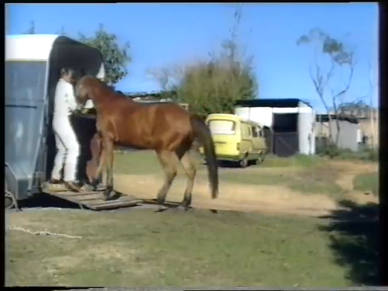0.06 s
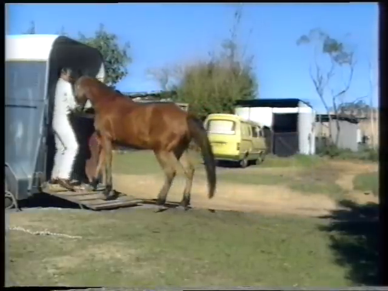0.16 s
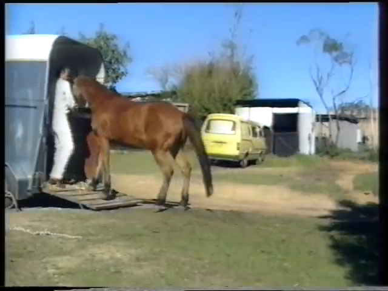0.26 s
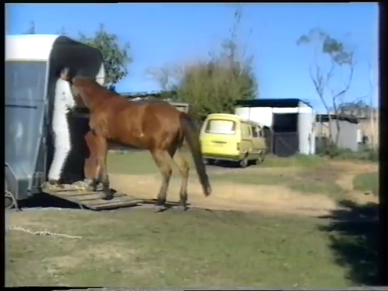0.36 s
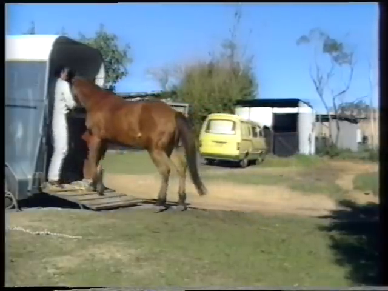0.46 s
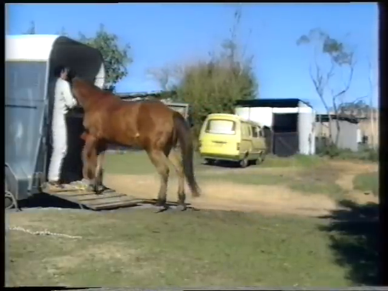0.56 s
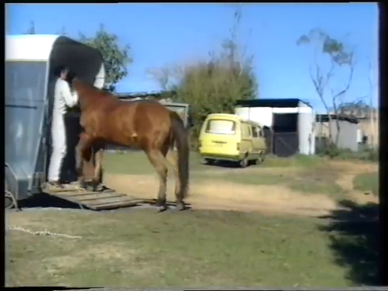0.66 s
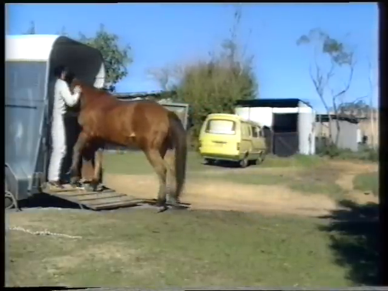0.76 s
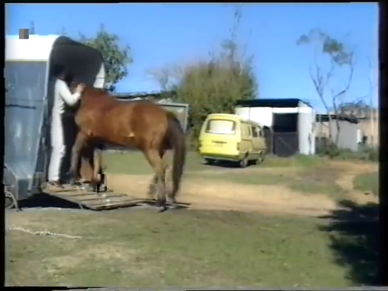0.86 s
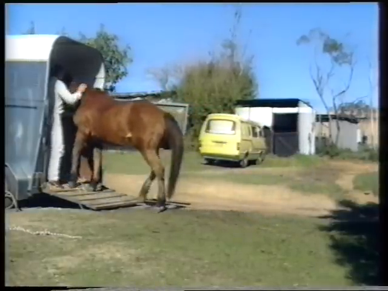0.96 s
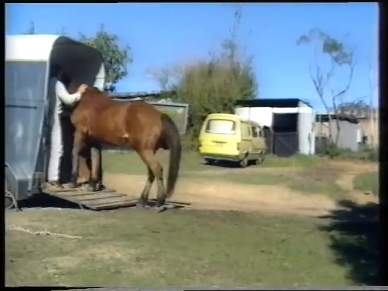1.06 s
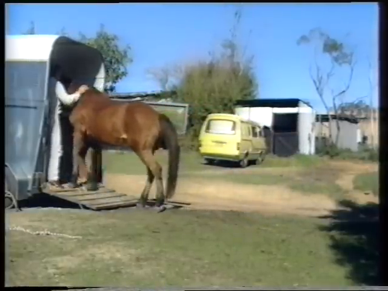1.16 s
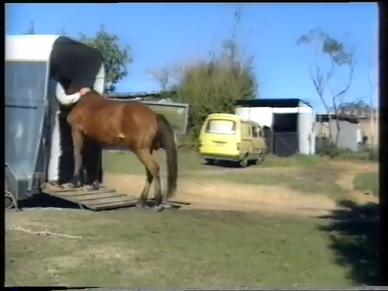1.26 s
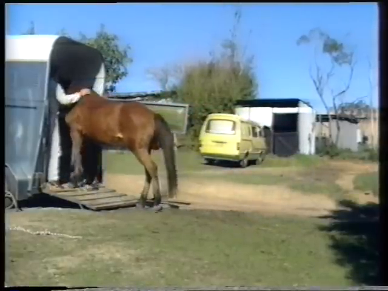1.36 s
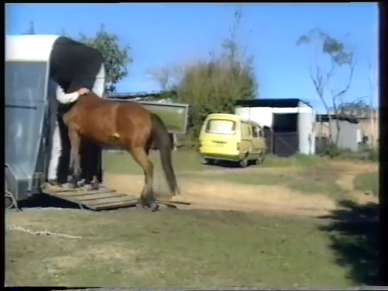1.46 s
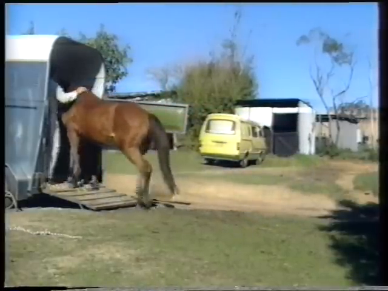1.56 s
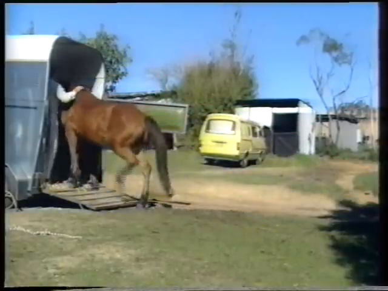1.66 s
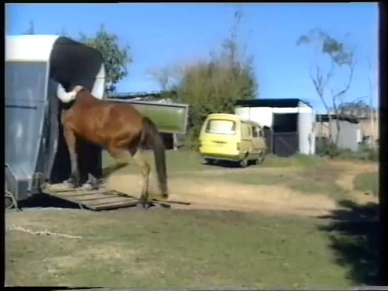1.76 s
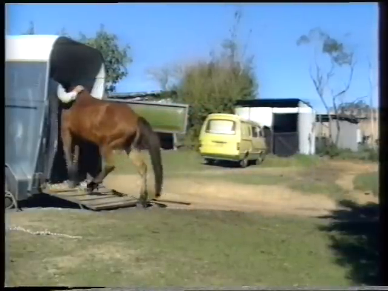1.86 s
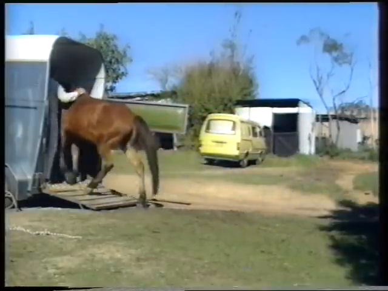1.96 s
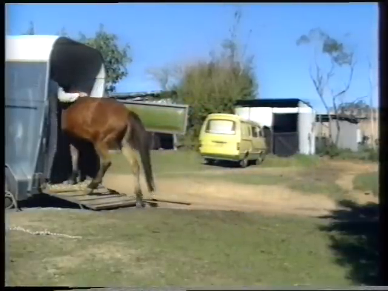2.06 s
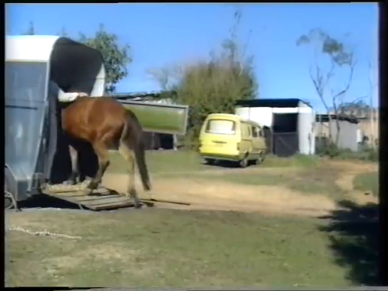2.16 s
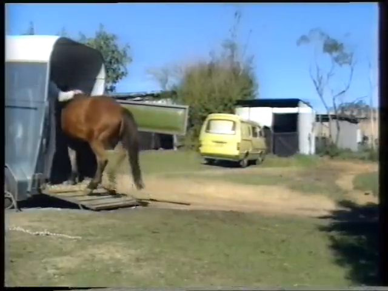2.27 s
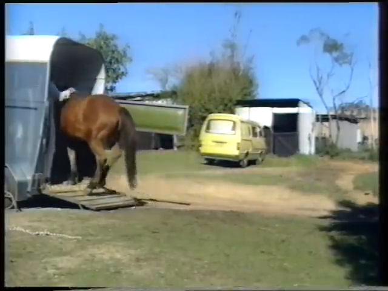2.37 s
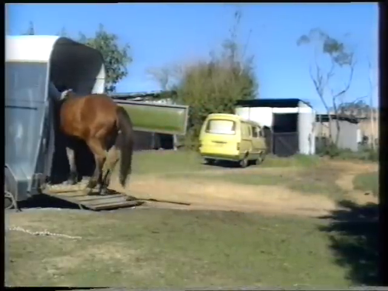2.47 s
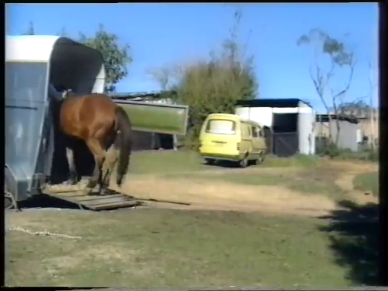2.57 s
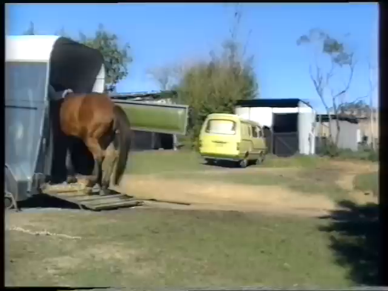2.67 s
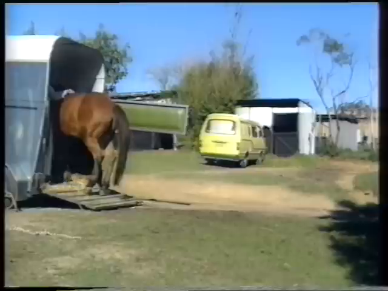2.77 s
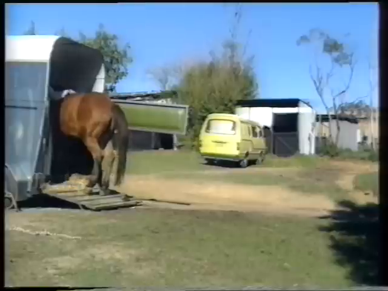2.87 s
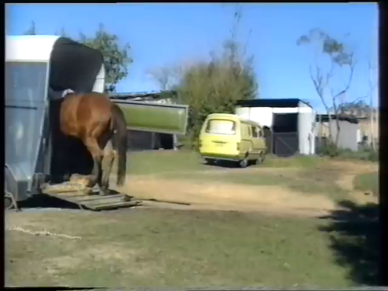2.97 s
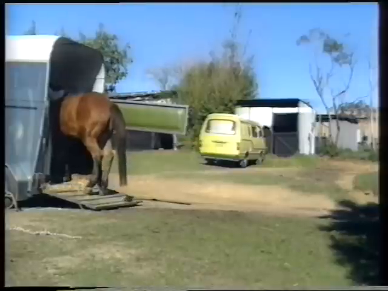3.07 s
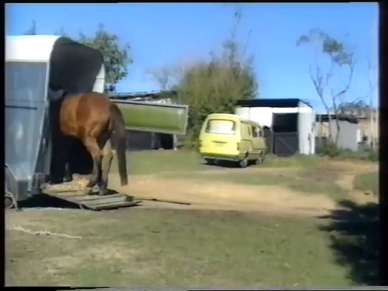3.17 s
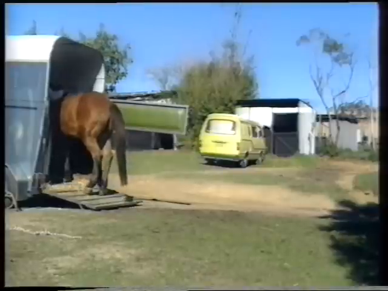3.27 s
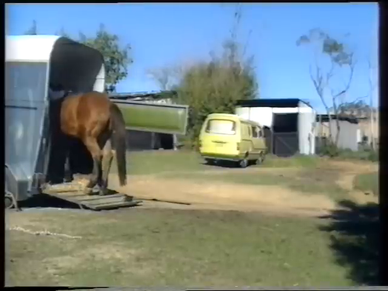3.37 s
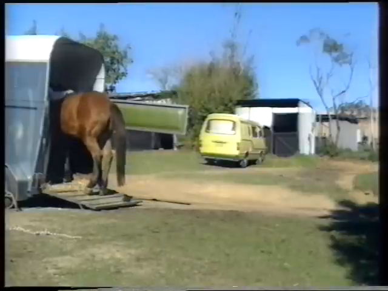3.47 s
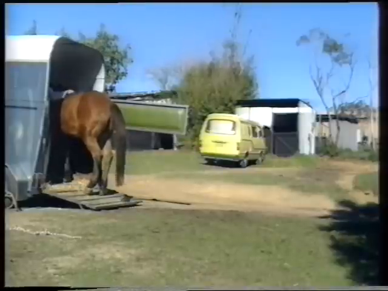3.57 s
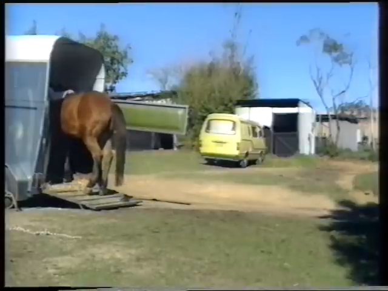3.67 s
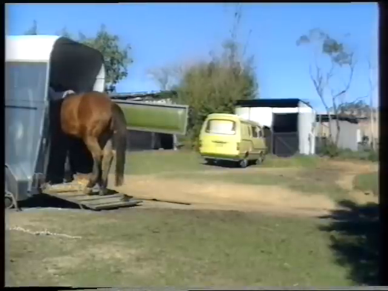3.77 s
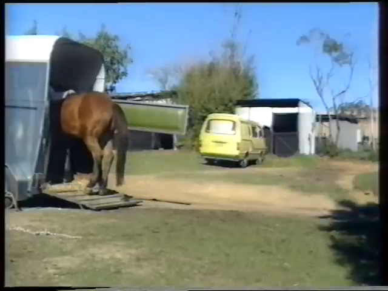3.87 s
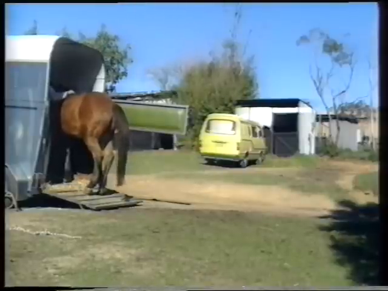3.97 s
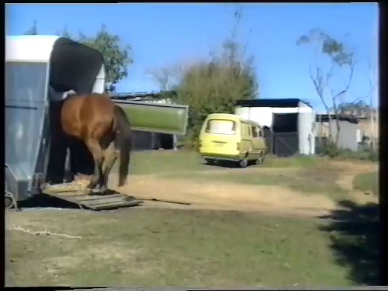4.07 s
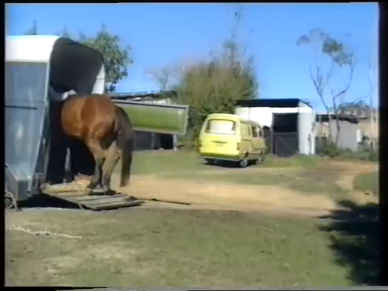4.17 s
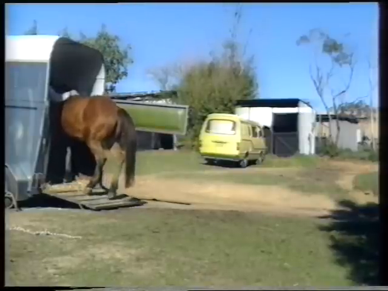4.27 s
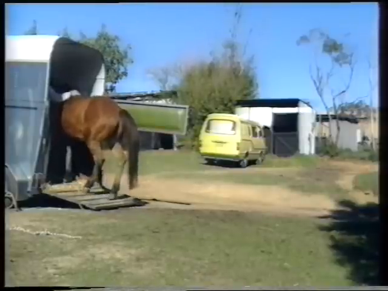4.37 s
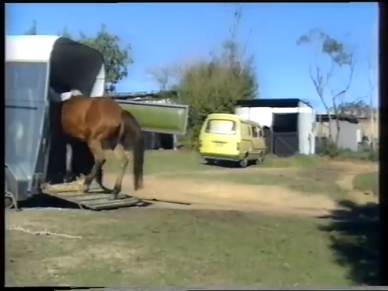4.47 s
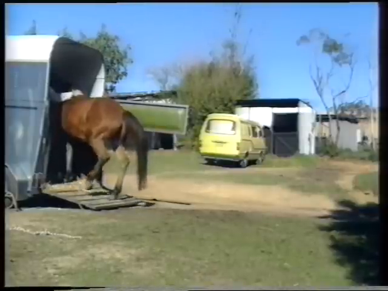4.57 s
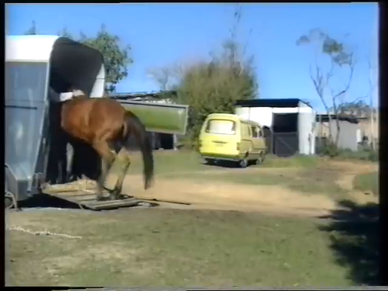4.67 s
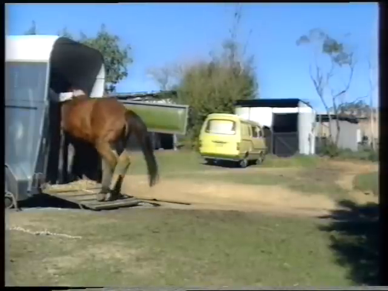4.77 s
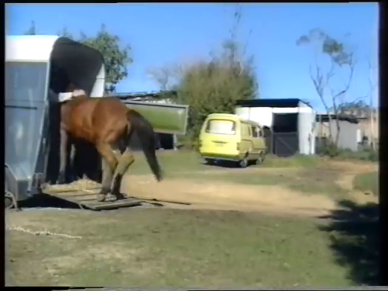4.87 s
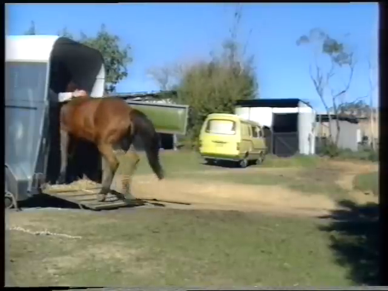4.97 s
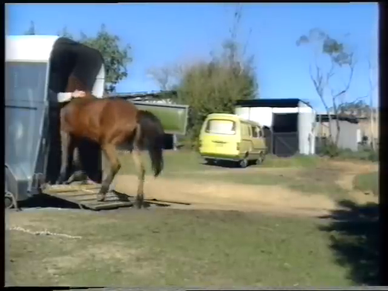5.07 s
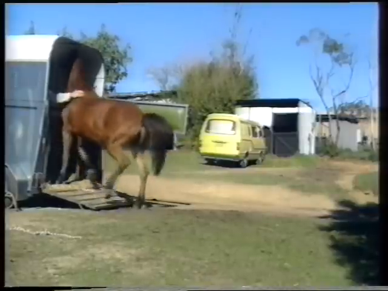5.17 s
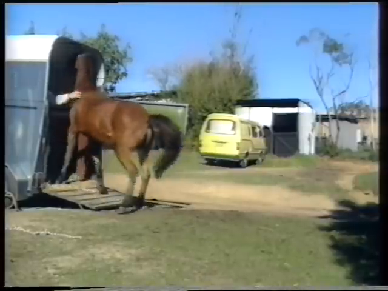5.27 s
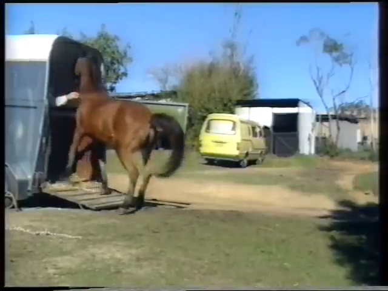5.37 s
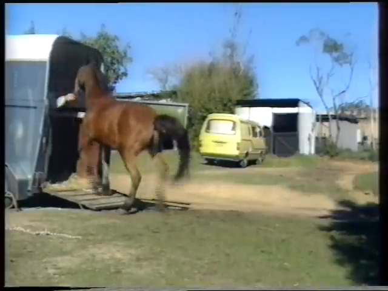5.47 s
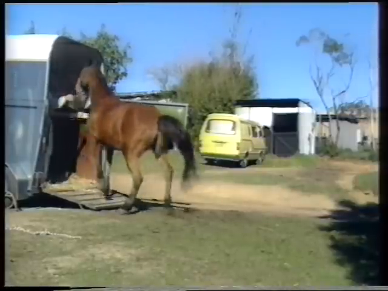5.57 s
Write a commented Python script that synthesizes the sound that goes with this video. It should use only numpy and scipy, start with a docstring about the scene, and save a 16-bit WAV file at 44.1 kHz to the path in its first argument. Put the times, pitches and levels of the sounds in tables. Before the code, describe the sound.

A horse steps into a wooden-floored trailer, pauses, then clatters back out; booming board knocks, gritty scrapes, old camera hiss and faint high whine.

```python
"""Across a quiet yard, a horse steps up a wooden ramp into a trailer and backs out again.
Each hoof knocks the boards, which boom as clusters of decaying modes; loose boards rebound and fittings clink.
The trailer shudders on and hooves scuff over grit: shaped noise and clicks under swelling gains.
Echoes come back from sheds and the trailer shell.
An old tape camera adds hiss, mains hum, its picture-line whine and field ticks."""
import sys
import numpy as np
from scipy import signal
from scipy.fft import rfft, irfft, next_fast_len
from scipy.io import wavfile

SR = 44100
rng = np.random.default_rng(int(sys.argv[2]) if len(sys.argv) > 2 else 0)


def file_out(sig):
    """Save sig as 16-bit WAV at sys.argv[1]."""
    # one column per channel
    cols = np.atleast_2d(sig).T
    # limit, then scale
    lim = np.clip(cols, -1, 1)
    pcm = np.round(lim * 32767).astype(np.int16)
    wavfile.write(sys.argv[1], SR, pcm)


def undo_db(level):
    """Turn decibels back into plain size, where 20 dB means ten times bigger."""
    steps = np.asarray(level, float) / 20
    return 10 ** steps


N = 247401  # samples in the scene


def evened(x):
    """Scales to rms 1."""
    return x / np.sqrt(np.mean(x ** 2) + 1e-20)


def read(points, hz):
    """Reads a table along log frequency."""
    f, value = np.transpose(points)
    return np.interp(np.log(hz + 1), np.log(f + 1), value)


def coloured(x, points):
    """Filters x by a spectrum and scales it to rms 1, so only the shape of the spectrum counts."""
    size = next_fast_len(x.shape[-1])
    gain = undo_db(read(points, np.fft.rfftfreq(size, 1 / SR)))
    return evened(irfft(rfft(x, size) * gain, size)[..., :x.shape[-1]])


def drift(per_s):
    """Slow random wander of rms 1: noise kept mostly below per_s Hz."""
    size = next_fast_len(N)
    smooth = 1 / (1 + (np.fft.rfftfreq(size, 1 / SR) / per_s) ** 4)
    return evened(irfft(rfft(rng.standard_normal(size)) * smooth, size)[:N])


def grains(per_s, spread_db):
    """Sparse clicks of random sign, a few of them large."""
    size = undo_db(spread_db * np.minimum(rng.exponential(1, N), 4)) * rng.standard_normal(N)
    return size * (rng.random(N) < per_s / SR)


# how much the horse shifts about between steps: t/s, change of the resting level/dB
RESTLESSNESS = [(0, 0), (.5, 0), (1.25, 1), (1.65, 3), (2.1, 0), (2.3, -4), (2.6, 0), (2.88, -5), (3.15, 1),
                (3.6, -2), (4.05, 0), (4.4, -4), (4.75, 1), (5.12, 2), (5.61, 4)]


def swells(peaks_s, peaks_db, rise_s, fall_s, rest_db):
    """Gain of swells that each rise to a peak and die away, summed in power over the restless shuffle."""
    t = np.arange(0, N + 64, 64) / SR
    late = t - peaks_s[:, None]
    # seconds per 20 dB on either side of the peak; signs in the tables do not matter
    rise = abs(rise_s + 0 * peaks_s)[:, None]
    fall = abs(fall_s)[:, None]
    span = np.where(late < 0, -rise, fall)
    power = (undo_db(peaks_db[:, None] - 20 * late / span) ** 2).sum(0)
    power += undo_db(rest_db + np.interp(t, *np.transpose(RESTLESSNESS))) ** 2
    return np.interp(np.arange(N) / SR, t, np.sqrt(power))


# spectrum of the yard and tape hiss: f/Hz, relative level/dB (per Hz)
AIR_SPECTRUM = [(15, -42), (25, 7), (102, -6.5), (123, -7.5), (152, -4), (316, -16), (352, 13), (392, 6),
                (637, -3.5), (929, -6.5), (1590, -12), (11000, -31), (13500, -23), (15800, -24)]


def yard_air():
    """Yard and tape hiss: shaped noise whose level wanders very slightly."""
    level_db = -58 + 0.18 * drift(3.7)
    return undo_db(level_db) * coloured(rng.standard_normal(N), AIR_SPECTRUM)


# mains hum partials: f/Hz, level/dB (rms)
MAINS_HUM = [(50, -61), (100, -57), (150, -58), (350, -65), (600, -72), (650, -72), (850, -74)]
# wavering picture-line tones: f/Hz, width/Hz, level/dB (rms before the shared wavering)
LINE_WHINE = [(15618, 80, -59), (15718, 70, -62.5), (15480, 300, -64), (11620, 50, -77), (11725, 60, -80)]


def electronics():
    """Mains hum, the wavering whine of the picture lines and two ticks in each picture field."""
    t = np.arange(N) / SR
    hum = sum(undo_db(db) * np.sqrt(2) * np.sin(2 * np.pi * (hz * t + rng.random())) for hz, db in MAINS_HUM)
    whine = sum(undo_db(db) * np.sqrt(2) * drift(width / 2) * np.sin(2 * np.pi * hz * t)
                for hz, width, db in LINE_WHINE)
    since_tick_s = (100 * t % 1 - .5) / 100  # 100 ticks a second
    field = np.exp(-since_tick_s ** 2 / .0003 ** 2) * drift(60)
    ticks = undo_db(-68) * evened(field * np.sin(2 * np.pi * 15200 * t))
    wavering = evened(undo_db(2.5 * drift(6)))
    return hum + wavering * (whine + ticks)


# spectra of grit and of rasping hooves: f/Hz, relative level/dB (per Hz)
GRIT_SPECTRUM = [(1500, -22), (3500, -4.5), (5500, -0.5), (8000, -0.5), (11000, -2.5), (14500, -9.5),
                 (16000, -24)]
RASP_SPECTRUM = [(300, -45), (600, -13), (1000, 0), (1500, 0), (2500, -7), (4000, -14), (6000, -24),
                 (10000, -76)]
# hooves skidding and dragging: peak t/s, 20 dB rise t/s, 20 dB fall t/s, grit level/dB, rasp level/dB
SCUFFS = [(0.0, .01, 0.4, -80, -51), (0.219, 0.12, 0.24, -55.5, -59), (0.335, -0.03, 0.1, -62, -52),
          (0.69, 0.26, 0, -57, -72), (0.77, 0.01, 0.18, -66, -42), (0.87, 0.08, 0.14, -72, -42.5),
          (1.01, 0.1, .5, -64, -51.5), (1.027, 0, 0, -57, -45.5), (1.08, 0, 0.4, -59, -65.5),
          (1.363, 0.03, 0.03, -46, -42), (1.473, 0, 0.08, -61, -37.5), (1.778, .015, .035, -36.5, -24.5),
          (1.815, .02, .06, -56, -38), (1.86, 0.4, .5, -54, -54), (2.09, 0.3, -0.7, -68, -55.5),
          (2.158, -0.05, -0.22, -55, -47), (2.375, .02, 0.06, -46, -46), (2.4, .05, 0.29, -70.5, -42.5),
          (2.672, 0, 0.11, -57, -41), (2.722, 0, 0.09, -66, -44), (2.775, .04, .05, -58, -67),
          (3.67, -0.02, .05, -71, -53.5), (4.141, 0.07, .03, -52, -50), (4.178, .015, -0.01, -54, -33),
          (4.264, 0.0531, 0.0355, -39.5, -31), (4.63, -0.0239, 0.12, -48.5, -30),
          (4.861, .07, 0.08, -45.5, -48), (4.924, 0.03, 0.03, -47.5, -39), (5.015, 0.07, 0, -50, -43.5),
          (5.08, 0.4, -0.3, -55, -58), (5.225, .09, 0.08, -44, -43.5), (5.254, 0.0627, 0.07, -39, -32.5),
          (5.31, .015, 0.24, -56, -39), (5.43, 0.26, 3, -56, -50), (5.58, 0.0121, -0.4, -45, -23.5),
          (5.61, 0.0443, .1, -40, -30)]


def scuffs():
    """Hooves skid and drag: dense bright clicks of grit and a sparser, lower rasp, never quite still."""
    s, rise, fall, grit_db, rasp_db = np.transpose(SCUFFS)
    grit = swells(s, grit_db, rise, fall, rest_db=-63.5) * coloured(grains(15000, 1.3), GRIT_SPECTRUM)
    rasp = swells(s, rasp_db, rise, fall, rest_db=-61.5) * coloured(grains(4000, 1.55), RASP_SPECTRUM)
    for s, db, *_ in HOOF_BLOWS:
        if db > -8:  # the hoof is lifted before a stamp
            rasp[max(round((s - .02) * SR), 0):round(s * SR)] *= .2
    return grit + rasp


# spectra of the shuddering body and the rumbling frame: f/Hz, relative level/dB (per Hz)
SHELL_SPECTRUM = [(29, -63), (50, -41), (81, -9), (136, -8), (264, -5), (356, -20.5), (453, -16),
                  (860, -21.5), (1510, -35.5), (6000, -88), (7800, -95), (13200, -120)]
FRAME_SPECTRUM = [(55, -35), (78, 2.5), (92, 2), (118, 3), (140, -31), (200, -48)]
# weight shifts that shake the trailer: peak t/s, frame level/dB, shell level/dB,
# 20 dB fall t/s of the frame (the shell takes 1.76 times as long)
WEIGHT_SHIFTS = [(0.03, -36, -34, -0.07), (0.23, -43, -56, 0.2), (0.791, -30, -35, 0.38),
                 (0.87, -32, -39, 0.19), (1.39, -39.5, -45, .15), (1.47, -38, -41, 0.07),
                 (1.78, -28.5, -48.5, 0.06), (1.97, -42, -39, .09), (2.2, -31.5, -35, 0.14),
                 (2.39, -34, -46, 0.13), (2.59, -46, -33.5, 0.27), (4.19, -34.5, -54.5, -0.1),
                 (4.39, -42, -53, 0.5), (4.66, -35, -37, .5), (4.83, -40, -35, .2),
                 (5.28, -23.5, -33, 0.03), (5.4, -44, -27.5, 0.25), (5.61, -40, -47.5, 1)]


def trailer_shudder():
    """Shifting weight shakes the trailer: its shell rattles as sparse clicks, its frame rumbles as low noise."""
    s, frame_db, shell_db, fall = np.transpose(WEIGHT_SHIFTS)
    shell_gain = swells(s, shell_db, 0.14, 1.76 * fall, rest_db=-53.5)
    shell = shell_gain * coloured(grains(1500, 2.16), SHELL_SPECTRUM)
    frame_gain = swells(s, frame_db, 0.065, fall, rest_db=-200)
    frame = frame_gain * coloured(rng.standard_normal(N), FRAME_SPECTRUM)
    return shell + frame


def ring(modes, t, longer, swell_cycles, spread, count):
    """Every mode is a cluster of close neighbours, one for each plank; bass swells late."""
    hz, db, t60 = np.repeat(modes, count, axis=0).T[..., None]
    phase, detune, weight = rng.random((len(hz), 3)).T[..., None]
    hz = hz * (1 + spread * (detune - .5))
    swell = 1 - np.exp(-t * hz / swell_cycles)
    gain = undo_db(db + 4 * (weight - .5) - 60 * t / (t60 * longer))
    return (swell * gain * np.sin(2 * np.pi * (hz * t + phase))).sum(0)


def clatter(x, t, longer):
    """The first contact is followed by ever weaker rebounds of loose boards. Peak 1."""
    hits = rng.random(len(t)) < 1200 / SR
    rebounds = rng.standard_normal(len(t)) * hits * undo_db(-10 - 60 * t / (0.31 * longer))
    rebounds[0] = 1
    x = signal.fftconvolve(np.pad(x, (0, len(t) - len(x))), rebounds)[:len(t)]
    return x / abs(x).max()


# modes of the ramp and floor boards: f/Hz, relative level/dB, t60/s before each blow's ring factor
BOARD_MODES = [(102, 3.5, 0.17), (111.7, -2.5, 0.27), (146.7, -2, 0.23), (176, -7.5, 0.33),
               (212.4, -0.5, 0.27), (247, -1.5, 0.22), (278.5, -2, 0.18), (318.7, -2.5, .2),
               (357.5, -1, 0.19), (423.8, -1, 0.17), (487.4, 2, 0.12), (549, 2, 0.078), (617, -1, .055),
               (716, -1, .055), (860, 0, .05), (990, -2, .045), (1150, -6, .04), (1310, -8, .035),
               (1557, -13, 0.034), (1818, -12, 0.024), (2160, -17, 0.023), (2365, -15.5, 0.018),
               (2850, -23.5, 0.021), (3330, -20.5, 0.013)]


def blow(db, boom_hz, knock_db, longer):
    """The boards nearest the hoof boom loudest; a knock and a short gritty crack ride on the attack."""
    t = np.arange(SR // 2) / SR
    boards = np.array(BOARD_MODES)
    # long spans boom, short spans knock
    long_spans, short_spans = boards[boards[:, 0] < 590], boards[boards[:, 0] >= 590]
    long_spans[:, 1] -= 11 * abs(np.log2(long_spans[:, 0] / boom_hz))  # dB lost an octave away
    boom = ring(long_spans, t, longer, swell_cycles=1.32, spread=0.1, count=2)
    boom = undo_db(db) * clatter(boom, t, longer)

    planks = [ring(short_spans, t[:SR // 8], longer, swell_cycles=0.49, spread=.22, count=2) for _ in range(5)]
    knock = sum(clatter(plank, t, longer) for plank in planks)  # each plank rebounds on its own
    knock *= undo_db(knock_db) / abs(knock).max()

    crack_band = signal.butter(2, [1500, 4500], "band", fs=SR, output="sos")
    hiss = signal.sosfilt(crack_band, rng.standard_normal(len(t)))
    crack_db = -34.5 + .55 * knock_db  # harder knocks crack louder
    crack = undo_db(crack_db) * evened(hiss) * undo_db(-60 * t / 0.12)

    landing = 1 - np.exp(-t / (0.0003 * undo_db(-.6 * knock_db)))  # light steps are set down softly
    fade_out = signal.windows.tukey(2 * len(t), .3)[len(t):]
    return (boom + knock + crack) * landing * fade_out


# hoof blows: t/s, boom level/dB, boom of the boards under the hoof f/Hz, knock level/dB, ring [factor on t60]
HOOF_BLOWS = [(0.004, -26, 220, -39.5, 1.66), (0.151, -26.5, 334, -32, 0.39),
              (0.332, -29.5, 256, -34, 0.37), (0.751, -7.5, 271, -9.5, 0.51), (0.828, -16.5, 204, -28, 1),
              (1.02, -32, 204, -36.5, 0.88), (1.359, -25.5, 110, -39, 1.4), (1.445, -25.5, 214, -32, 1.01),
              (1.468, -32, 250, -27, .9), (1.598, -46.5, 102, -32, 0.64), (1.768, -2.5, 207, -7.5, 0.84),
              (1.957, -35.5, 99.6, -31.5, 1.2), (2.076, -32.5, 223, -45.5, 2), (2.156, -23, 247, -24, 1.3),
              (2.207, -41, 91.5, -38, 2.2), (2.369, -3.5, 162, -12.5, 0.78),
              (2.446, -17.5, 247, -22.5, 1.52), (2.669, -30, 219, -27.5, 1.27),
              (2.719, -25, 228, -27.5, 0.59), (3.669, -37, 244, -40.5, 0.79), (3.898, -52, 170, -42, 0.78),
              (4.168, -7, 177, -15, 0.94), (4.262, -13, 232, -17, 0.85), (4.566, -38, 205, -37, 0.66),
              (4.622, -3.5, 252, -12.5, 0.59), (4.918, -28.5, 395, -38.5, 1.1),
              (5.008, -29, 411, -35, 0.23), (5.159, -36, 410, -30, .8), (5.217, -40, 410, -30, .8),
              (5.257, -12.5, 410, -11.5, 0.53), (5.296, -10.5, 150, -14, 0.54),
              (5.577, -2.5, 333, -12, 0.63)]


def hoof_blows():
    """Hooves strike the boards one after another, each blow ringing on over the next."""
    out = np.zeros(N + SR)
    for s, *stroke in HOOF_BLOWS:
        sound = blow(*stroke)
        out[round(s * SR):][:len(sound)] += sound
    return out[:N]


# decay of the yard's echo: f/Hz, t60/s
ECHO_DECAY = [(100, 0.71), (300, 0.63), (1000, 0.59), (3000, 0.29), (10000, 0.37)]


def yard_echo(x):
    """Echoes from sheds and the trailer shell: noise whose bands die at their own speed."""
    hz, t, z = signal.stft(rng.standard_normal(SR), SR, nperseg=256)
    decay = undo_db(-60 * t / read(ECHO_DECAY, hz)[:, None])
    tail = signal.istft(z * decay * (t > .012), SR, nperseg=256)[1]
    return signal.fftconvolve(x, tail / np.linalg.norm(tail))[:N]


# loose fittings that sing for a moment: t/s, f/Hz, level/dB, time to fade 20 dB t/s
FITTINGS = [(0.155, 420, -36, .05), (1.975, 720, -38, .04), (1.975, 1050, -42, .035),
            (2.08, 2280, -56, .06), (2.71, 2300, -52, .07), (5.16, 950, -34, .04), (5.295, 1050, -28, .02)]


def clinks():
    """Each fitting chatters near one pitch, as noise through a resonance; it starts fast and fades."""
    out = np.zeros(N + SR)
    for s, hz, db, length in FITTINGS:
        t = np.arange(0, 2 * length, 1 / SR)
        r = np.exp(-np.pi * .06 * hz / SR)  # chatter spreads each pitch by 6 %
        resonance = [1, -2 * r * np.cos(2 * np.pi * hz / SR), r * r]
        chatter = signal.lfilter([1], resonance, rng.standard_normal(len(t)))
        gain = undo_db(db - 20 * (t / length) ** 2) * np.minimum(t / .005, 1)
        out[round(s * SR):][:len(t)] += gain * evened(chatter)
    return out[:N]


def scene():
    """One microphone hears it all; both tracks carry the same sound."""
    air = yard_air()
    camera = electronics()
    horse = scuffs() + trailer_shudder() + hoof_blows() + clinks()
    # little of the horse's sound reaches below 65 Hz
    horse = signal.sosfilt(signal.butter(2, 65, "high", fs=SR, output="sos"), horse)
    return np.tile(horse + undo_db(-14) * yard_echo(horse) + air + camera, (2, 1))


def roll_off(x):
    """The treble ends steeply here."""
    return signal.sosfilt(signal.butter(12, 16950, fs=SR, output="sos"), x)


# balance of the two tracks: f/Hz, left minus right level/dB
TRACK_LEAN = [(60, 2.0), (240, 2.0), (950, 1.0), (3770, 0.5), (15000, 1.0)]


def record(dry):
    """The tape squashes peaks softly; the tracks differ in level and timing, each with a little hiss of its own."""
    squashed = 0.69 * np.tanh(dry / .7)
    hissing = squashed + undo_db(-85.5) * rng.standard_normal((2, N))
    size = next_fast_len(N)
    hz = np.fft.rfftfreq(size, 1 / SR)
    side = np.array([[.5], [-.5]])  # left, right
    balance = undo_db(side * read(TRACK_LEAN, hz))
    skew = np.exp(2j * np.pi * hz * side * 5.5e-6)  # s; the tape head is slightly tilted, so the left leads
    edge = 1 / (1 + (hz / 15790) ** 400)  # Hz; the tape carries nothing higher
    tracks = irfft(rfft(hissing, size) * balance * skew * edge, size)[:, :N]
    return roll_off(tracks)


dry = scene()
out = record(dry)
file_out(out)
```